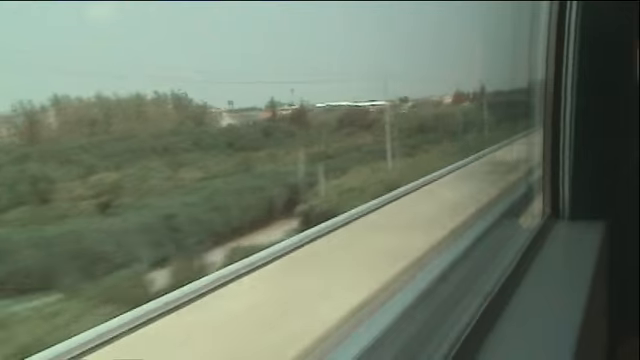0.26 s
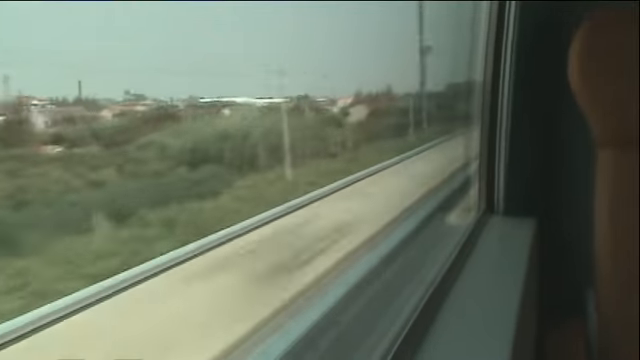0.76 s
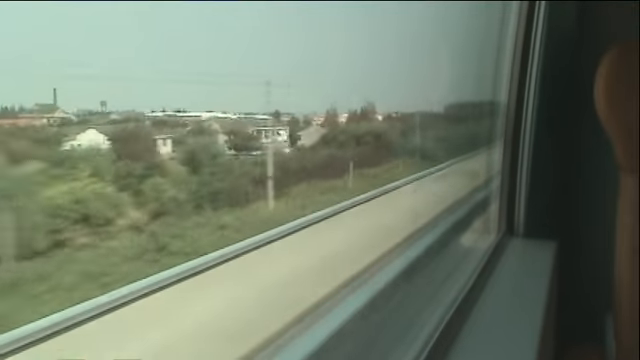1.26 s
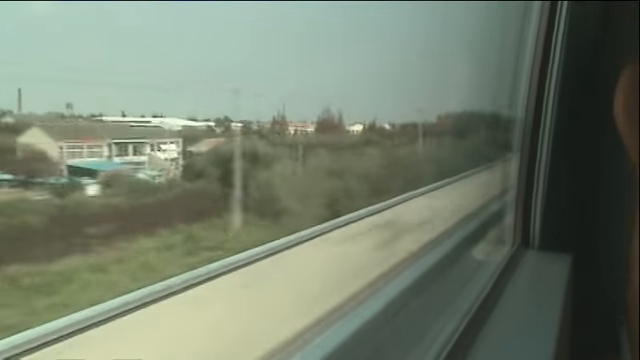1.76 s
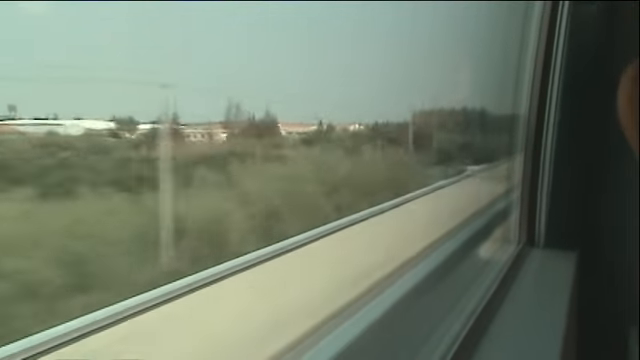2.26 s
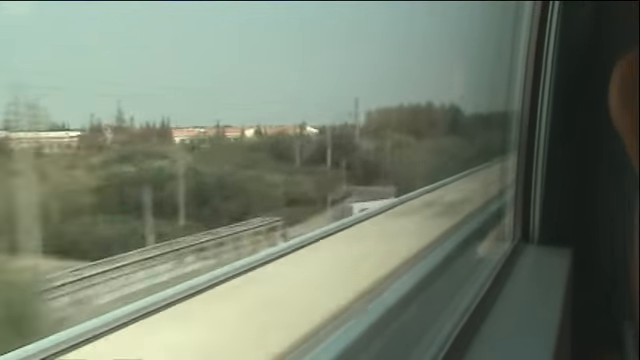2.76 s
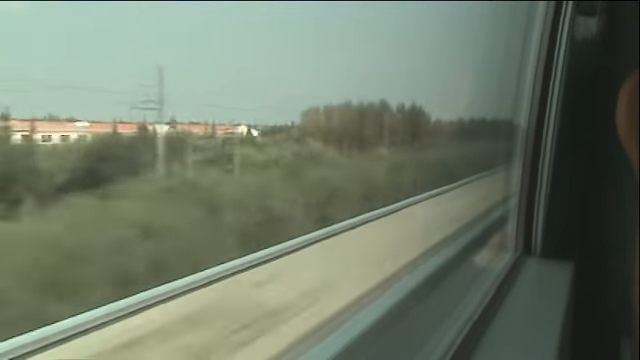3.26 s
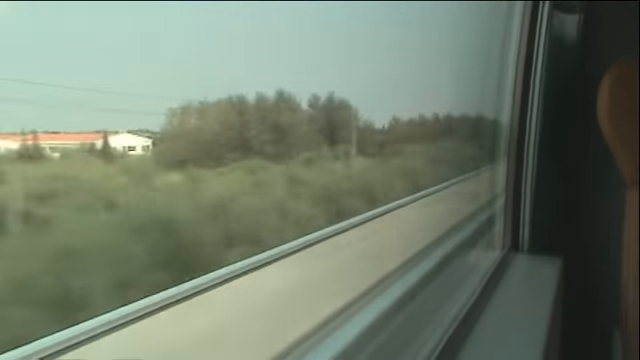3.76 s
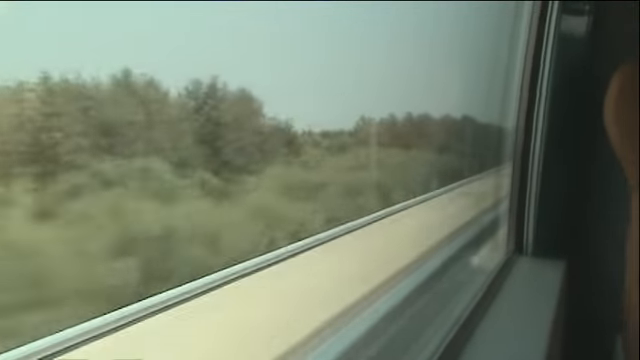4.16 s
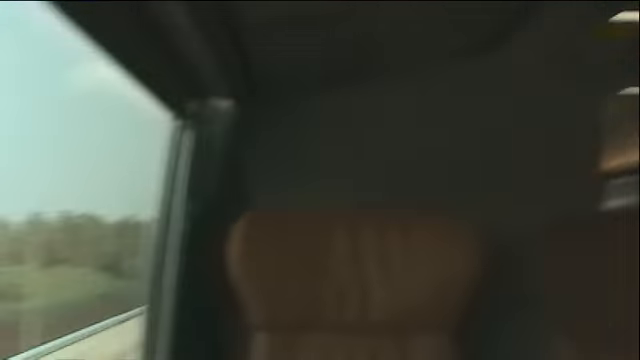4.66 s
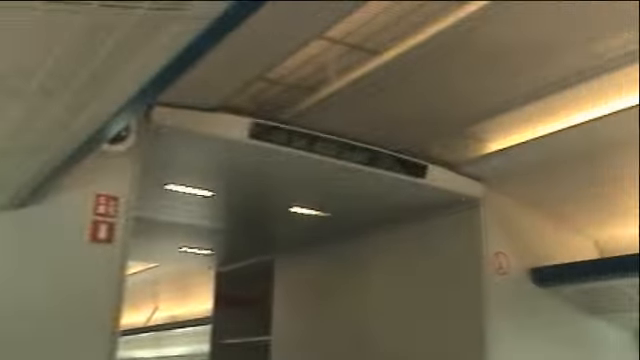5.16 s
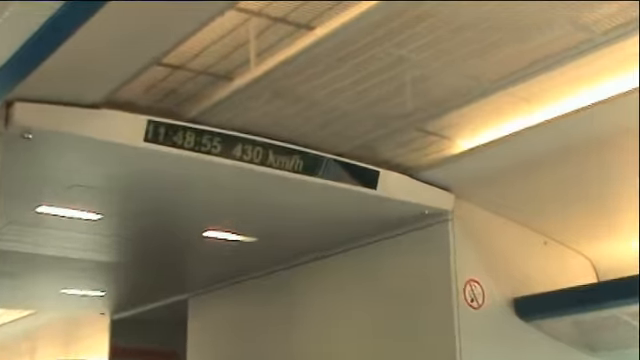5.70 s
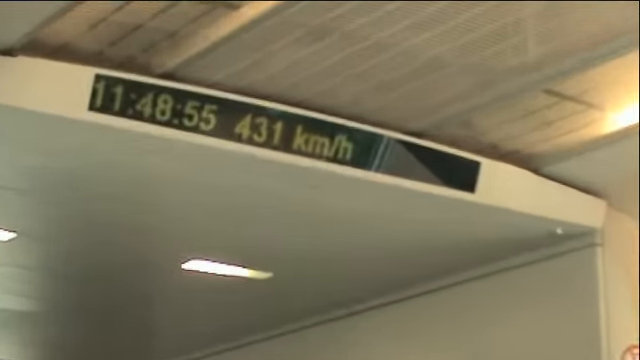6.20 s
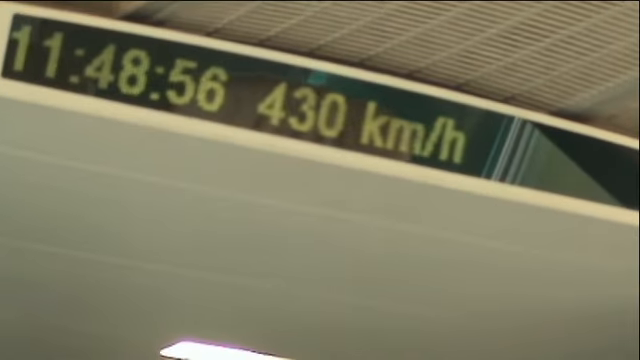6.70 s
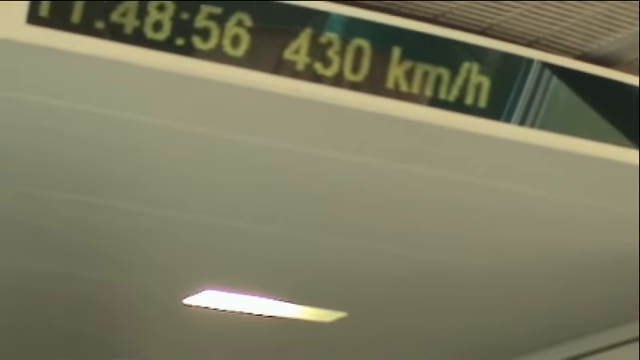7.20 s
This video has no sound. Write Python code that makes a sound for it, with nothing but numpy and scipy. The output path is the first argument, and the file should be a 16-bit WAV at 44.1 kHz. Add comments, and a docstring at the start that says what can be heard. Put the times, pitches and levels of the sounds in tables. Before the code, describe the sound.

Inside a very fast train, a loud steady bass-heavy rush of air with faint hum and airy whistles; one tiny plastic tick near the end.

```python
"""Air rushing along the hull of a very fast maglev train, heard inside the cabin: broad, bass-heavy noise.
The noise also rings in fixed cabin, floor and window resonances, and two airy whistles wander in pitch.
The periodic guideway hums a row of faint sine orders; late on, plastic ticks once near the microphone.
A hand-held camera with two microphone ports turns from the window to the aisle, changing colour and balance;
its limiter ducks both channels on the peaks."""
import sys
import numpy as np
from scipy import signal
from scipy.fft import rfft, irfft
from scipy.io import wavfile

SR = 44100
rng = np.random.default_rng(int(sys.argv[2]) if len(sys.argv) > 2 else 0)


def dump(signal):
    """Clip the signal to [-1, 1] and save it as 16-bit WAV at the path in sys.argv[1]."""
    limited = np.clip(np.atleast_2d(signal).T, -1, 1)
    pcm = np.round(limited * 32767).astype(np.int16)
    wavfile.write(sys.argv[1], SR, pcm)


def gain_from_decibels(decibels):
    """Convert decibel values to linear amplitude factors."""
    exponent = np.asarray(decibels, float) / 20
    return 10 ** exponent


N = 328104

# the camera's turn from the window to the aisle
TURN_START_S, TURN_LENGTH_S = 4.62, 0.22
# guideway sections pass at this rate
SECTION_HZ = 38.67
# plastic tick near the microphone, level ahead of its filters: start_s, level_db, t60_s, low_hz, high_hz
PLASTIC_TICK = (6.7622, -25, .012, 3800, 11300)
# orders of the section rate, rms levels ahead of their wavering: multiple, window_db, aisle_db
GUIDEWAY_ORDERS = [(3, -24.5, -32), (6, -29.5, -36), (7, -32, -32), (10, -40.5, -46.5), (11, -42, -36),
                   (12, -53.5, -45), (13, -40, -37.5), (14, -36.5, -41), (16, -36, -48.5),
                   (17, -46.5, -53.5), (18, -40, -51), (24, -43, -55), (27, -51.5, -56.5),
                   (30, -55.5, -40.5), (31, -47, -51), (32, -53.5, -46.5), (36, -47, -45)]
# airy whistles wandering in pitch, rms levels: time_s, pitch_hz, level_db
LOW_WHISTLE_PATH = [(0, 1177, -34), (2, 1188, -40), (4, 1189, -36.5), (5.6, 1191, -33.5), (6.4, 1223, -32),
                    (7.44, 1201, -33)]
HIGH_WHISTLE_PATH = [(0, 3290, -51), (.9, 3372, -47.5), (3.5, 3370, -48), (4.35, 3360, -44.5),
                     (4.55, 3324, -51), (5.9, 3308, -53), (6.5, 3420, -50), (7.44, 3450, -51.5)]
# cabin, floor and window resonances driven by air noise, rms levels:
# centre_hz, pole_width_hz, window_db, aisle_db
CABIN_RESONANCES = [(55, 16, -24, -24), (108, 34, -17, -17), (325, 40, -33, -31), (620, 90, -36, -42),
                    (1290, 40, -42, -42), (5200, 500, -62, -62), (230, 55, -20.5, -33), (266, 35, -24, -30),
                    (1148, 14, -38, -46), (2916, 25, -58, -65)]
# air and running noise through the hull, relative density per Hz: pitch_hz, window_db, aisle_db
HULL_SPECTRUM = [(20, -18.5, -18.5), (39, -21, -20), (50.6, -7.5, -8.5), (85, -5.5, -6.5), (138, -3, -4),
                 (194, -9, -12), (296, -12.5, -15), (388, -18.5, -17.5), (774, -26.5, -26.5),
                 (980, -28.5, -28), (1585, -35, -36.5), (2370, -42.5, -41.5), (4080, -52, -54.5),
                 (4920, -57, -56.5), (7920, -68.5, -68), (12300, -88, -89), (13200, -93.5, -93.5),
                 (13800, -120, -120)]
# the two microphone ports: pitch_hz, left_lead_rad, likeness_0_to_1, left_over_right_db
PORT_RESPONSE = [(35.4, 1.1, 0.6, 3.5), (60, 1.1, 1, 3.5), (95, 0.79, 1, 4), (207, 1.22, 1, 3.5),
                 (400, 1.48, 0.95, 2), (1000, 1.34, 0.78, 1.7), (1460, 1, 0.85, 2.5), (2200, .72, .83, 2),
                 (3220, 0.74, 0.9, 3.5), (4700, .1, 0.8, 2.5), (7000, .06, 0.8, 0.7), (10000, .01, 0.85, 1)]


def rms_one(x):
    """Scale to rms 1."""
    return x / np.sqrt(np.mean(x ** 2) + 1e-20)


def in_time(rows):
    """Columns of a curve table at every sample."""
    time_s, *columns = np.transpose(rows)
    return [np.interp(np.arange(N) / SR, time_s, column) for column in columns]


def at_hz(points, hz):
    """Columns of a spectrum table on a log-frequency axis."""
    table_hz, *columns = np.transpose(points)
    return [np.interp(np.log(hz + 1), np.log(table_hz), column) for column in columns]


def drift(pole_width_hz, count):
    """Rows of slow chance with spread about 1: noise through two equal low-pass poles."""
    hop, settle = 40, 2000   # samples per slow step; slow steps dropped while the filter settles
    r = np.exp(-2 * hop * np.pi * pole_width_hz / SR)
    white = rng.standard_normal((count, N // hop + settle + 2))
    slow = signal.lfilter([1], [1, -2 * r, r * r], white)[:, settle:]
    steps = np.arange(slow.shape[1])
    return np.array([np.interp(np.arange(N) / hop, steps, rms_one(row - row.mean())) for row in slow])


def narrow_noise(pole_width_hz):
    """Two rows of complex low-passed noise: shifted up to a centre they make a noisy resonance."""
    settle = 4000
    r = np.exp(-np.pi * pole_width_hz / SR)
    white = rng.standard_normal((2, N + settle)) + 1j * rng.standard_normal((2, N + settle))
    low = signal.lfilter([1], [1, -2 * r, r * r], white)[:, settle:]
    return low / np.sqrt(np.mean(abs(low) ** 2) / 2)   # the real part has rms about 1


def tick():
    """Plastic tick near the microphone: a dry burst of bright noise that dies in a few milliseconds."""
    start_s, level_db, t60_s, low_hz, high_hz = PLASTIC_TICK
    age_s = np.arange(N) / SR - start_s
    decay = gain_from_decibels(level_db - 60 * np.clip(age_s, 0, 1) / t60_s)
    burst = rng.choice([-1, 1], N) * (age_s >= 0) * decay
    burst = signal.lfilter([0.45], [1, -0.55], burst)   # the top of the tick is weaker
    band = signal.butter(6, [low_hz, high_hz], "band", fs=SR, output="sos")
    return signal.sosfilt(band, burst + 1e-18)


def guideway(facing, waver_db, waver_rad):
    """Sine orders of the section rate; each wavers in level and phase as the cabin's sound field shifts."""
    t, hum = np.arange(N) / SR, np.zeros(N)
    count = len(GUIDEWAY_ORDERS)
    swell, sway = drift(3.5, count), drift(2.67, count)
    start_rad = rng.uniform(0, 2 * np.pi, count)
    for k, (multiple, window_db, aisle_db) in enumerate(GUIDEWAY_ORDERS):
        level_db = window_db + facing * (aisle_db - window_db) + waver_db * swell[k]
        phase = 2 * np.pi * multiple * SECTION_HZ * t + start_rad[k] + waver_rad * sway[k]
        hum += np.sqrt(2) * gain_from_decibels(level_db) * np.sin(phase)
    return hum


def whistle(path, pole_width_hz):
    """Airy whistle: noise in a resonance whose centre wanders."""
    pitch_hz, level_db = in_time(path)
    carrier = np.exp(2j * np.pi * np.cumsum(pitch_hz) / SR)
    return gain_from_decibels(level_db) * np.real(narrow_noise(pole_width_hz) * carrier)


def cabin_modes(facing):
    """Air noise ringing in fixed cabin, floor and window resonances."""
    boom_low_hz, boom_high_hz, boom_db_per_s = 200, 300, 0.6
    t, ringing = np.arange(N) / SR, 0
    # the boom at the window grows until the turn, passing its table level halfway there
    build_db = boom_db_per_s * (t - TURN_START_S / 2) * (1 - facing)
    for centre_hz, pole_width_hz, window_db, aisle_db in CABIN_RESONANCES:
        level_db = window_db + facing * (aisle_db - window_db)
        if boom_low_hz < centre_hz < boom_high_hz:
            level_db = level_db + build_db
        carrier = np.exp(2j * np.pi * centre_hz * t)
        ringing = ringing + gain_from_decibels(level_db) * np.real(narrow_noise(pole_width_hz) * carrier)
    return ringing


def rush(facing):
    """Turbulent air on the hull: two unrelated rows of broad noise, coloured by where the camera faces."""
    white = rfft(rng.standard_normal((2, N)))
    hz = np.arange(N // 2 + 1) * SR / N
    window, aisle = (irfft(white * gain_from_decibels(colour_db), N) for colour_db in at_hz(HULL_SPECTRUM, hz))
    return gain_from_decibels(-12.5) * rms_one(window + facing * (aisle - window))   # -12.5 dB rms overall


def ports(common, diffuse):
    """Both ports hear the common field, left leading in phase and louder; the diffuse rest is opposed."""
    edge = 4096   # samples of mirrored, faded margin that keep the two ends apart
    ramp = np.arange(N + 2 * edge)
    fade = np.minimum(1, np.minimum(ramp, ramp[::-1]) / edge)
    padded = np.pad([common, diffuse], [(0, 0), (edge, edge)], "reflect", reflect_type="odd")
    common, diffuse = rfft(padded * fade)
    lead_rad, likeness, balance_db = at_hz(PORT_RESPONSE, np.arange(len(common)) * SR / len(fade))
    likeness = np.clip(likeness, 0, 1)
    mid = common * np.sqrt((1 + likeness) / 2)
    rest = diffuse * np.sqrt((1 - likeness) / 2)
    # half of the lead and balance on each port
    skew = gain_from_decibels(balance_db / 2) * np.exp(0.5j * lead_rad)
    left_right = np.array([(mid + rest) * skew, (mid - rest) / skew])
    return irfft(left_right, len(fade))[:, edge:edge + N]


def scene():
    """All sources as the two microphone ports pick them up."""
    # 0 at the window, 1 in the aisle
    facing = np.clip((np.arange(N) / SR - TURN_START_S) / TURN_LENGTH_S, 0, 1)
    field = rush(facing) + cabin_modes(facing)
    field = field + whistle(LOW_WHISTLE_PATH, pole_width_hz=160)
    field = field + whistle(HIGH_WHISTLE_PATH, pole_width_hz=270)
    common = field[0] + guideway(facing, waver_db=2.5, waver_rad=1.05) + tick()
    return ports(common, field[1])


def limiter(x, knee_db, squeeze, release_db_s, attack_s):
    """One gain for both channels follows the peaks: fast down, slower back."""
    level_db = 20 * np.log10(abs(x).max(axis=0) + 1e-9)
    # each peak is held, falling at the release rate
    ramp_db = release_db_s * np.arange(N) / SR
    held_db = np.maximum.accumulate(level_db + ramp_db) - ramp_db
    cut_db = squeeze * np.maximum(held_db - knee_db, 0)
    r = np.exp(-1 / (attack_s * SR))
    smooth_db, _ = signal.lfilter([1 - r], [1, -r], cut_db, zi=[np.median(cut_db)])
    return x * gain_from_decibels(-smooth_db)


def band_limit(x):
    """A steep low-pass at the top of the band."""
    return signal.sosfilt(signal.butter(12, 16400, fs=SR, output="sos"), x)


def record(dry):
    """The camera's limiter, a fixed gain, then overload of the tallest peaks."""
    limited = limiter(dry, knee_db=-7.5, squeeze=0.6, release_db_s=173.5, attack_s=0.0013)
    mix = np.clip(gain_from_decibels(3.5) * limited, -1, 1)
    return band_limit(mix)


dry = scene()
out = record(dry)
dump(out)
```